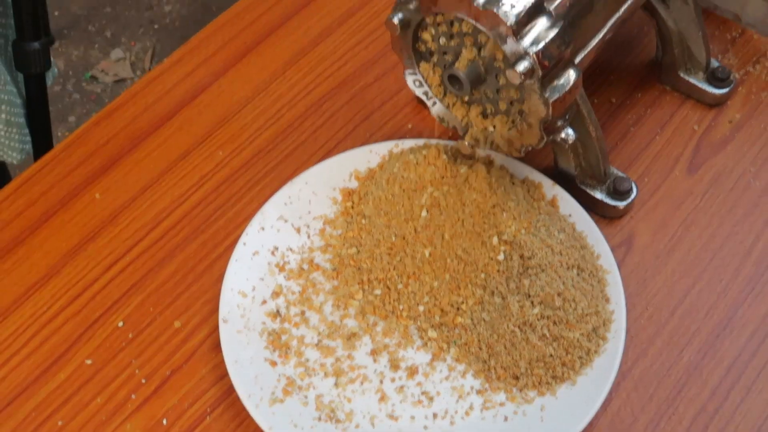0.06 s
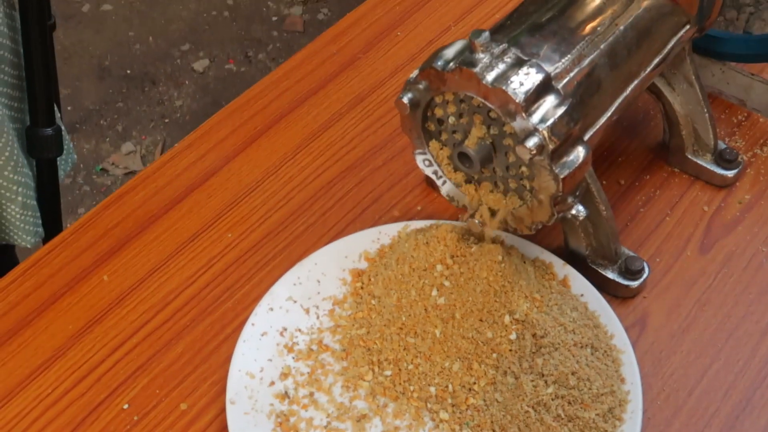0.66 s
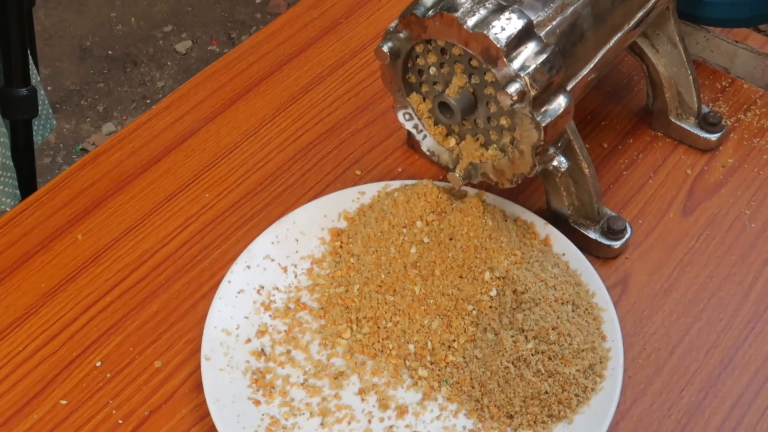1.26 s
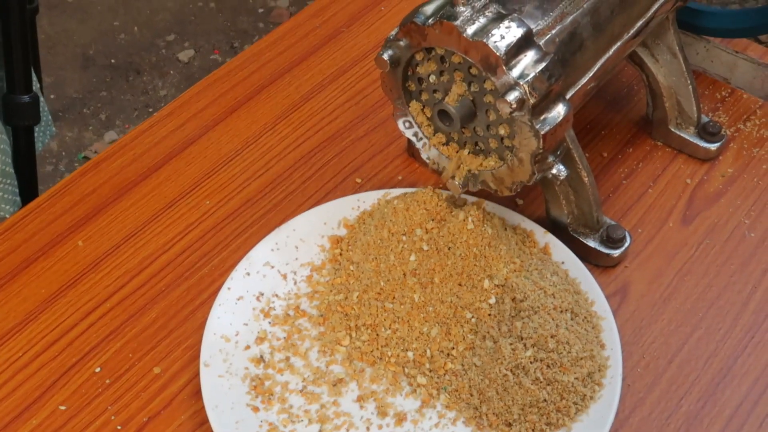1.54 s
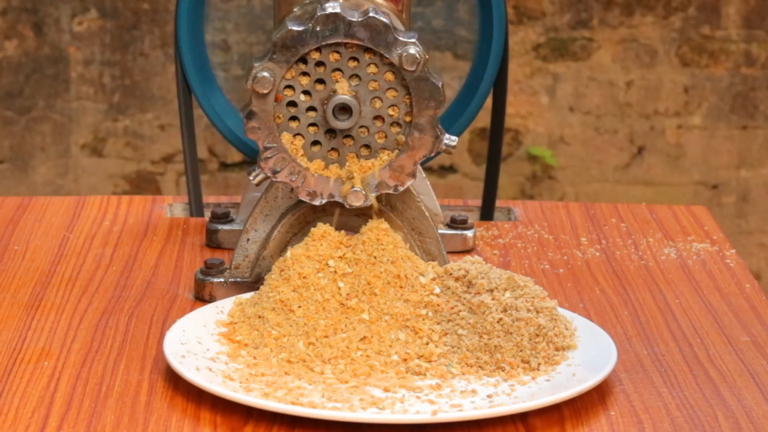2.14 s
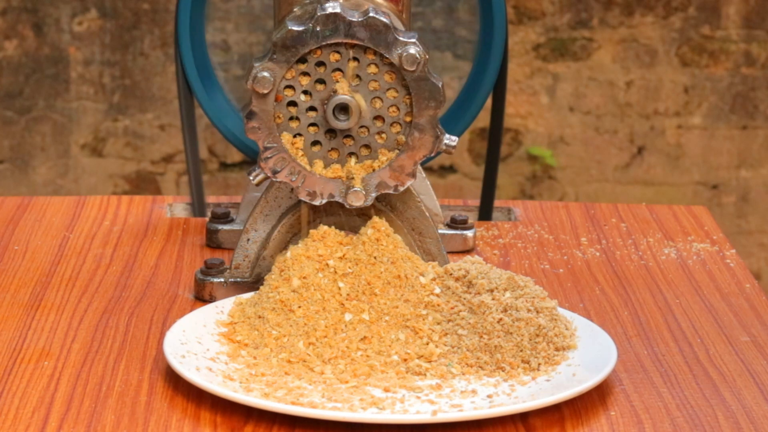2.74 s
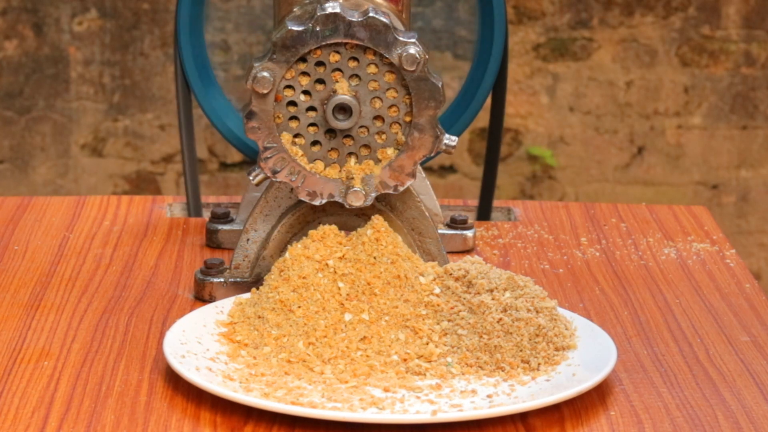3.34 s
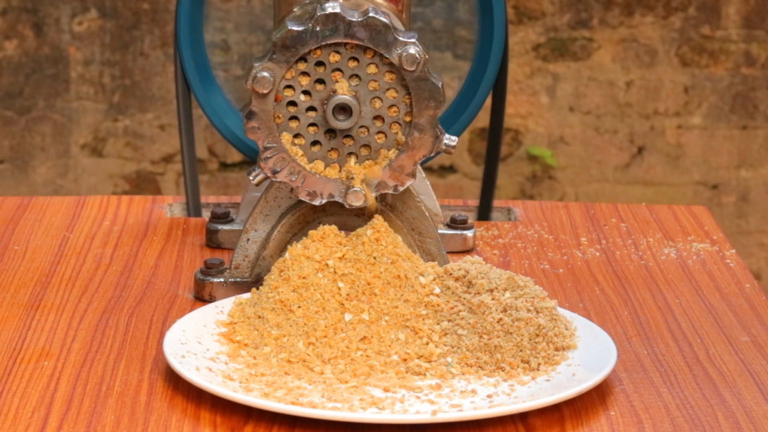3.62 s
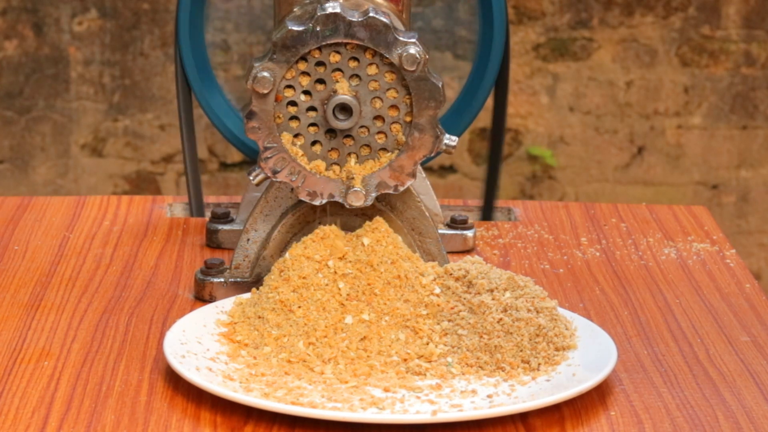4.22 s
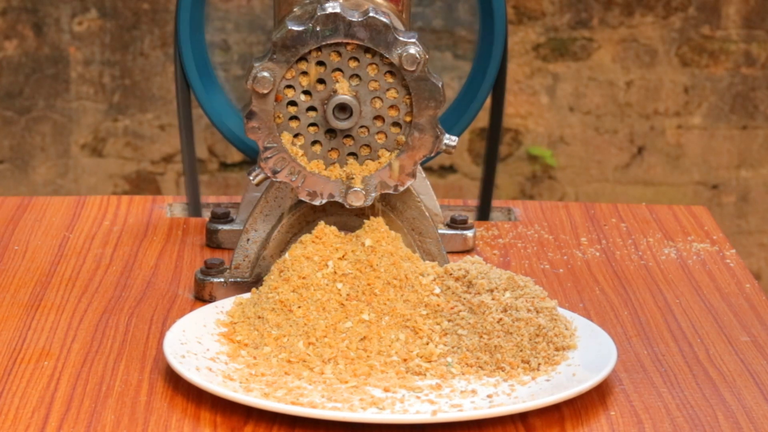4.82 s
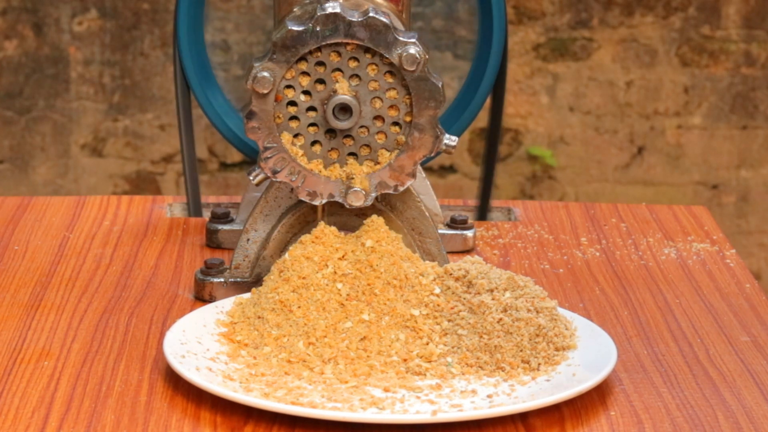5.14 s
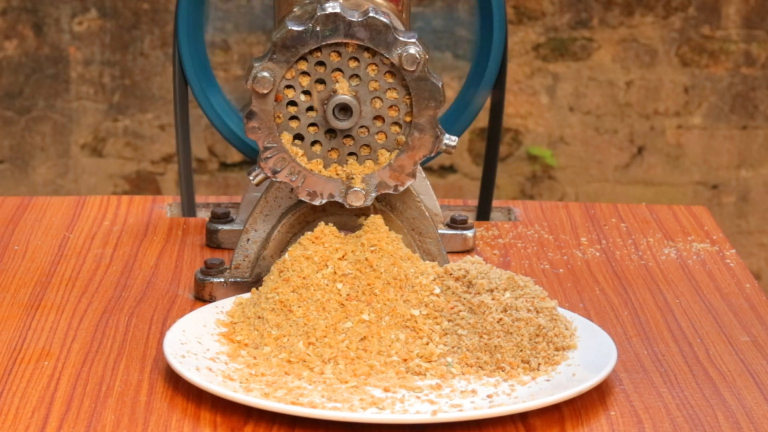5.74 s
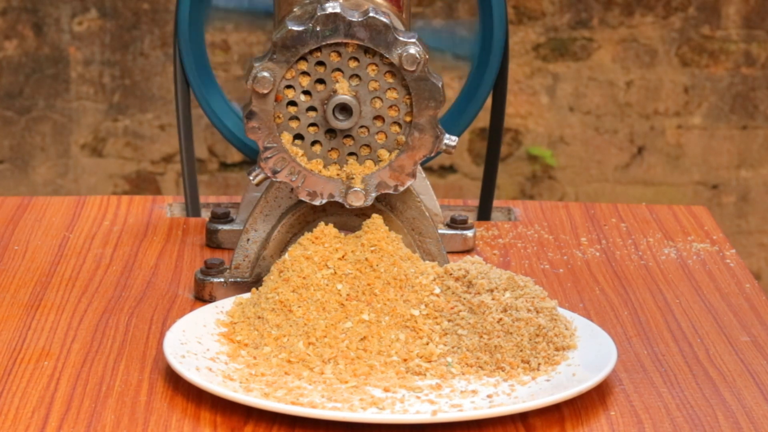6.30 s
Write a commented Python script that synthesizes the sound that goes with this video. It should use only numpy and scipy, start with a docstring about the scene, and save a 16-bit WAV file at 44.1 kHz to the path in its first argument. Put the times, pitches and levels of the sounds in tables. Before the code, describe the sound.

Close up, a metal meat grinder mills cookies with dense churning, irregular knocks, a crumbly rasp and short metallic pings. The sound turns duller and quieter as the microphone shifts to the front, where a motor hum and faint belt buzz come through. The grinding thins, metal snaps sharply, and the machine coasts with soft rubs and another crack. The yard adds a slight echo.

```python
"""A belt-driven metal meat grinder, bolted to a wooden table outdoors, mills cookies and slowly runs empty.
The microphone starts close beside the full barrel: the auger churns and knocks, crumbs rattle and rasp,
the knife pings on the plate. From 1.66 s it is in front of the plate, where the motor hums, the drive
buzzes and the feed thins out. At 5.6 s metal snaps sharply and the hum drops away; the grinding dies,
a faint chirp passes, and parts rub and snap as the machine coasts."""
import sys
import numpy as np
from scipy import signal
from scipy.fft import rfft, irfft
from scipy.io import wavfile

SR = 44100
rng = np.random.default_rng(int(sys.argv[2]) if len(sys.argv) > 2 else 0)


def digitize_waveform(pressure):
    """Quantize a signal to 16-bit integers and store it at the path in sys.argv[1].

    Rows of a 2-D input are taken as channels; values are limited to [-1, 1].
    """
    field = np.atleast_2d(pressure).T
    bounded = np.clip(field, -1, 1)
    quanta = np.round(bounded * 32767).astype(np.int16)
    wavfile.write(sys.argv[1], SR, quanta)


N = 289672

MOVE_S, FADE_S = 1.657, .008   # the microphone goes from beside the barrel to in front of the plate
SHAFT_HZ, PLATE_HZ = 7.35, 3600   # turning of the auger, ring of the perforated plate
# The hard auger knocks. Each row: start in seconds, clack, thud and edge in dB, contact pitch in Hz.
HARD_KNOCKS = [(0.002, -27, -19, -31.5, 1030), (0.157, -30.5, -23.5, -40, 1360),
               (0.198, -29, -14, -38, 2020), (0.270, -31.5, -31, -46, 1120),
               (0.334, -23.5, -12, -35.5, 2010), (0.4678, -32.5, -17, -62, 1900),
               (0.597, -31, -14, -62, 1320), (0.7078, -29.5, -23.5, -38, 1660),
               (0.821, -32, -17.5, -39, 1360), (0.872, -25, -12, -36.5, 1300),
               (0.949, -39.5, -52, -46, 1960), (1.0038, -25.5, -12.5, -45, 2000),
               (1.158, -38, -40, -62, 2220), (1.246, -32, -32, -38.5, 1340), (1.276, -34, -25, -62, 1880),
               (1.4201, -28.5, -19.5, -36, 1180), (1.492, -34, -45, -41, 1210),
               (1.524, -32.5, -40, -37, 2000), (1.7394, -33, -17.5, -46, 1510),
               (1.951, -44.5, -27.5, -63, 1590), (1.9846, -34.5, -35, -49, 1460),
               (2.085, -44, -35, -71, 1060), (2.155, -33.5, -25, -48, 1480), (2.225, -36.5, -33, -49, 1620),
               (2.42, -38.5, -24.5, -51, 1570), (2.559, -41, -23.5, -55, 1000),
               (2.64, -35.5, -23, -65, 1350), (2.805, -41, -35, -54, 1520), (2.968, -50, -24, -58, 1460),
               (2.987, -35, -23, -45, 1490), (3.1096, -32.5, -27, -39.5, 2000),
               (3.183, -38, -43, -52, 1480), (3.249, -30.5, -29, -41.5, 1540),
               (3.384, -35.5, -34, -50, 1530), (3.452, -48, -46, -58, 1520),
               (3.6523, -31, -26.5, -42.5, 1540), (3.789, -41.5, -28.5, -46, 1530),
               (4.054, -29.5, -46, -49, 1480), (4.3338, -31, -26.5, -44, 1560),
               (4.408, -41, -38, -50.5, 1410), (4.469, -38.5, -51, -56, 1020), (4.564, -43, -37, -63, 1260),
               (4.5965, -35, -35, -53, 1360), (4.716, -40.5, -52, -54, 1630), (4.735, -40, -40, -59, 1440),
               (4.875, -37.5, -32, -51.5, 1500), (4.966, -42.5, -31.5, -71, 1510),
               (5.010, -34.5, -30, -54, 1430), (5.116, -39, -36, -58, 1450), (5.146, -35, -29.5, -55, 1330),
               (5.222, -44.5, -38.5, -53, 1310), (5.277, -37, -54, -59, 1480),
               (5.4186, -41, -38.5, -59, 1900), (5.555, -39.5, -31, -57, 1500),
               (5.659, -39, -51.5, -46, 1510), (5.6896, -30, -34, -54, 1470),
               (5.856, -45, -40.5, -71, 1504)]
# The spectrum of crumbs scraping the plate. Each row: frequency in Hz, level in dB.
RASP_SPECTRUM = [(1200, -43.5), (2200, 3.5), (2900, -0.5), (3550, 1.5), (4300, -5), (5300, -4),
                 (6300, -14.5), (7500, -18), (10000, -18), (12000, -19), (13800, -16.5), (16000, -31.5)]


def grinding(beside, press_s, churn_db, rattle_db, rasp_db, ring_db, sing_db, sing_width_hz,
             throb_db, flutter_db, crackle_db, crackles_per_s, clump_db):
    """Crumbs are crushed in surges, two and four to a turn of the shaft; the pressure peaks at press_s."""
    low_db, middle_db, high_db = auger_load(beside)
    turn = 2 * np.pi * SHAFT_HZ * (np.arange(N) / SR - press_s)
    surge_db = throb_db * (np.cos(2 * turn) + np.cos(4 * turn)) + flutter_db * drift(70)
    churn = rms_one(body(grains(6000, 1.47) * from_db(0.44 * surge_db), beside, wander_db=3))
    rattle = rms_one(metal(grains(1100, 2.94) * from_db(surge_db), beside, wander_db=1.5))
    rasp = rms_one(plate(grains(4100, 2.0) * from_db(0.45 * surge_db), ring_db))
    # the knife sets the plate singing in short, uneven spells
    plate_tone = resonance(resonance(grains(5000, 0.88), PLATE_HZ, sing_width_hz), PLATE_HZ, 300)
    singing = rms_one(plate_tone * from_db(10 * np.tanh(drift(36))))
    bright = rasp + from_db(sing_db) * singing + from_db(crackle_db) * crackle(crackles_per_s)
    bright *= from_db(clump_db * np.tanh(drift(28)))   # crumbs come through in clumps
    return (from_db(low_db + churn_db) * churn + from_db(middle_db + rattle_db) * rattle
            + from_db(high_db + rasp_db) * bright)


def auger_load(beside, swell_s=0.013, spill_s=0.021, empty_s=5.708, empty_db_per_s=91):
    """Churn, rattle and rasp in dB: up 1 dB around each hard knock, dying once the barrel is empty."""
    # The load heard beside the full barrel, and in front as it empties and the feed grows uneven.
    # Each row: time in seconds, then churn, rattle and rasp in dB.
    load_beside = [(0.0, -20.5, -34.5, -42), (0.3, -24.5, -36.5, -43.5), (0.4, -23, -34.5, -43.5),
                   (0.66, -24, -36.5, -43), (0.73, -19.5, -33, -42), (1.0, -22.5, -34.5, -44.5),
                   (1.66, -21, -31, -40.5)]
    load_front = [(1.69, -25.5, -40, -53.5), (2.01, -24.5, -41.5, -53.5), (2.17, -28, -43, -55.5),
                  (2.26, -27.5, -42.5, -54.5), (3.01, -30, -41.5, -53.5), (3.05, -33.0, -44.5, -52.5),
                  (3.72, -35.5, -40, -58.5), (4.3, -36, -46.5, -64), (4.42, -34.5, -41, -58),
                  (4.52, -46, -51.5, -65.5), (4.59, -36, -44.5, -59), (4.73, -43, -48.5, -65),
                  (4.84, -41, -47.5, -60), (4.97, -34.5, -41.5, -63), (5.21, -41.5, -46, -63),
                  (5.39, -36, -43, -61.5), (5.46, -42.5, -47, -70.5), (5.82, -37, -46, -52.5)]
    t = np.arange(N) / SR
    knock_s = np.r_[-1, np.sort(np.array(HARD_KNOCKS)[:, 0]), 2 * N / SR]
    coming = np.searchsorted(knock_s, t)
    swell_db = np.exp((t - knock_s[coming]) / swell_s)
    spill_db = np.exp((knock_s[coming - 1] - t) / spill_s)   # crumbs spill through after the knock
    emptying_db = empty_db_per_s * np.maximum(t - empty_s, 0)
    return np.array(in_time(load_beside if beside else load_front)) + swell_db + spill_db - emptying_db


def knocks(beside, light, clack_db, thud_db, thud_hz, body_db, edge_db, strike, hold_s, decay_s, edge_hz):
    """The auger catches a piece and hits the barrel: a metal clack, a table thud, a bright edge."""
    out = np.zeros(N)
    cushion = signal.butter(4, edge_hz, fs=SR)   # the cookie softens the contact
    table_band = signal.butter(3, [thud_hz / 1.255, thud_hz * 1.407], "band", fs=SR, output="sos")
    for s, middle_db, low_db, high_db, hz in list(HARD_KNOCKS) + light:
        if (s < MOVE_S) != beside:
            continue
        force = signal.lfilter(*cushion, blow(strike, hold_s, decay_s))
        clack = attack_one(metal(force, beside) + 1.98 * double_resonance(force, hz, 410))
        push = blow(strike, hold_s=0.0065, decay_s=0.0054)
        damped = attack_one(signal.sosfilt(table_band, push))
        thud = attack_one(damped + from_db(body_db) * attack_one(body(push, beside)))
        scrape = signal.lfilter(*cushion, crush(hold_s, decay_s=0.0092))
        edge = attack_one(plate(scrape, ring_db=8))
        add(out, s, from_db(middle_db + clack_db) * clack + from_db(low_db + thud_db) * thud
            + from_db(high_db + edge_db) * edge)
    return out


def light_knocks(beside, press_s, clack_db, thud_db, edge_db, hz, chance=.75, jitter_s=0.0043):
    """Between hard knocks the auger catches small pieces on its half turns; rows as in HARD_KNOCKS."""
    lead_s, last_piece_s = .006, 5.9   # a piece is caught just before the pressure peaks
    half_turn_s = .5 / SHAFT_HZ
    hard_s = np.array(HARD_KNOCKS)[:, 0]
    times = np.arange((press_s - lead_s) % half_turn_s, last_piece_s, half_turn_s)
    load_db, rows = auger_load(beside), []
    for s, (late, weak, pitch), luck in zip(times, rng.standard_normal((200, 3)), rng.random(200)):
        if luck < chance and np.abs(hard_s - s).min() > half_turn_s / 2:
            low_db, middle_db, high_db = load_db[:, int(s * SR)] - 0.5 * weak
            rows.append((s + jitter_s * late, middle_db + clack_db, low_db + thud_db,
                         high_db + edge_db, hz * np.exp(.14 * pitch)))
    return rows


def body(force, beside, wander_db=0):
    """Grinder and table answer a force with their low modes."""
    # The modes heard from each place. Each row: frequency in Hz, width in Hz, gain in dB.
    modes_beside = [(106, 5.2, -10.5), (145, 7.1, 0), (168, 21, -5), (194, 19, -6), (264.6, 22.4, 0),
                    (294, 31, -11), (341, 19, -0.5), (372, 25, -9), (462.4, 16, -3.5), (608, 17, -15),
                    (787, 91, -13.5)]
    modes_front = [(105, 42, -22), (177, 62, -21.5), (291, 18.7, -12), (346, 44, -11), (411, 20.6, -9.5),
                   (465.7, 22.7, 0.5), (516, 27.6, -3.5), (592, 26, -15.5), (718.4, 41, -13.5),
                   (898, 26, -19)]
    modes, band_hz = (modes_beside, [70, 727]) if beside else (modes_front, [146, 910])
    return ring(force, modes, band_hz, wander_db, in_phase=True)


def metal(force, beside, wander_db=0):
    """The cast barrel, auger and plate answer a force with their middle modes."""
    # The modes heard from each place. Each row: frequency in Hz, width in Hz, gain in dB.
    modes_beside = [(860, 26, -6), (1183, 53, 9), (1490, 340, 3), (1793, 230, 4), (1930, 100, 8),
                    (2210, 110, 3.5), (2950, 410, -8.5)]
    modes_front = [(910, 160, -2.5), (1340, 165, 1.5), (1502, 246, -1.5), (1605, 74, 2), (1900, 210, -9.5),
                   (2194, 47, -2.5), (2373, 120, -9.5)]
    modes, band_hz = (modes_beside, [680, 2980]) if beside else (modes_front, [840, 2290])
    return ring(force, modes, band_hz, wander_db)


def plate(force, ring_db):
    """Bright scraping with the thin ring of the perforated plate."""
    scrape = colour(force, RASP_SPECTRUM)
    return scrape + from_db(ring_db) * resonance(scrape, PLATE_HZ, width_hz=330)


def crackle(per_s, spread_db=4.5, width_hz=840, pitches=12):
    """Single crumbs burst, each ringing briefly at one of several pitches."""
    clicks, pitch_index = grains(per_s, spread_db), rng.integers(0, pitches, N)
    bursts = sum(resonance(clicks * (pitch_index == k), hz, width_hz)
                 for k, hz in enumerate(np.geomspace(2500, 13500, pitches)))
    return rms_one(colour(bursts, RASP_SPECTRUM))


def lumps(gain_db, hold_s, decay_s, relative_width):
    """Soft lumps are shoved along the barrel: the table answers each with a dull bump at one pitch."""
    # Each row: start in seconds, level in dB, pitch in Hz.
    shoves = [(0.127, -20.5, 166.6), (0.404, -20, 163), (0.473, -15, 366), (0.743, -23, 466),
              (0.823, -17, 337), (1.226, -21, 460), (1.429, -30, 144), (1.567, -17.5, 358),
              (1.742, -21.5, 552), (1.895, -23, 502), (2.488, -44, 980), (2.662, -25, 476),
              (2.845, -24, 503), (5.625, -34, 450)]
    out = np.zeros(N)
    for s, db, hz in shoves:
        bump = double_resonance(blow(26, hold_s, decay_s), hz, relative_width * hz)
        add(out, s, from_db(db + gain_db) * attack_one(bump, size=1300))
    return out


def dry_ticks(gain_db, hold_s, decay_s, relative_width):
    """Small dry ticks of cracking crumbs or touching metal, each pitched, with a bright spray above it."""
    # Each row: start in seconds, level in dB, pitch in Hz, spray in dB relative to the tick.
    ticks = [(0.411, -35, 2500, -30), (0.653, -41, 3900, -20), (0.708, -40, 5170, -24),
             (0.787, -40, 4460, -20), (0.872, -43, 5200, -26), (0.934, -38, 3430, -21),
             (1.247, -48, 4240, -11), (1.312, -45, 4800, -19), (1.329, -37, 3600, -26),
             (1.466, -46, 4200, -19), (1.544, -40, 2600, -22), (1.611, -39.5, 5200, -9),
             (2.378, -45, 3670, -15), (2.405, -52.5, 5200, -10), (2.431, -52.5, 4230, -19),
             (2.569, -57, 4600, -20), (2.69, -53, 3570, -12), (2.840, -52, 4000, -21),
             (2.866, -51, 3700, -17), (2.968, -53, 3400, -11), (3.107, -42, 3280, -25),
             (3.275, -50, 2900, -22), (3.491, -53, 3050, -19), (3.540, -49, 3380, -26),
             (3.786, -51, 3300, -28), (3.899, -46, 2700, -26), (5.767, -52.5, 3040, -32),
             (6.038, -53.5, 3220, -43), (6.065, -59.5, 3200, -42), (6.086, -61.5, 3000, -36.5),
             (6.339, -33, 3470, -32.5), (6.403, -52, 3900, -24), (6.417, -59, 4300, -15),
             (6.448, -51.5, 3130, -25), (6.5207, -47, 4100, -40)]
    out = np.zeros(N)
    spray_band = signal.butter(2, [6500, 13500], "band", fs=SR, output="sos")
    soften = signal.butter(4, 6000, fs=SR, output="sos")
    for s, db, hz, spray_db in ticks:
        force = crush(hold_s, decay_s)
        tick = attack_one(double_resonance(signal.sosfilt(soften, force), hz, relative_width * hz), 300)
        spray = attack_one(signal.sosfilt(spray_band, force), 300)
        add(out, s, from_db(db + gain_db) * (tick + from_db(spray_db) * spray))
    return out


def knife_pings(gain_db, hold_s, decay_s, width_hz):
    """The knife snags and scrapes for an instant: the plate answers with a short, rough ping."""
    # Each row: start in seconds, level in dB.
    snags = [(0.0, -29), (0.143, -39.5), (0.198, -39), (0.27, -36), (0.337, -29), (0.396, -43),
             (0.494, -37), (0.534, -36), (0.651, -34), (0.71, -30), (0.788, -37), (0.872, -40),
             (0.933, -35), (1.109, -43), (1.247, -30), (1.421, -33), (1.49, -44), (1.521, -41),
             (1.614, -46.5)]
    out = np.zeros(N)
    for s, db in snags:
        ping = resonance(resonance(blow(14, hold_s, decay_s), PLATE_HZ, width_hz), PLATE_HZ, 400)
        add(out, s, from_db(db + gain_db) * attack_one(ping))
    return out


def snaps(gain_db, treble_db, tail_s, treble_s, split_hz=8200):
    """Metal snaps against metal: a short, very bright crack and its diffuse, dying tail."""
    # Each row: start in seconds, level in dB, relative treble in dB, rise in seconds, relative tail in dB.
    hits = [(2.226, -26.5, -26, 0.00053, -22), (5.599, -29.5, 1, .0003, -37),
            (5.6167, -11, 1, 0.00017, -29.5), (5.642, -36.5, 0, .001, -32),
            (6.317, -34.5, -22, 0.0055, -22), (6.3329, -29, -4, 0.0078, -17)]
    # The colour of the crack. Each row: frequency in Hz, level in dB.
    spectrum = [(400, -32), (1300, -9.5), (2130, 6), (2900, -6.5), (3550, 1), (4400, -4.5), (6200, -9),
                (7500, -22), (10000, -20), (11400, -11), (12400, -14), (13000, -12), (13550, -3),
                (14000, -13.5), (14600, -20), (16000, -13)]
    out = np.zeros(N)
    lowpass, highpass = (signal.butter(4, split_hz, side, fs=SR, output="sos") for side in ("low", "high"))
    for s, db, high_db, rise_s, tail_db in hits:
        force = crush(rise_s + 0.00079, 0.005, size=32768) + from_db(tail_db) * crush(0, tail_s, size=32768)
        t = np.arange(len(force)) / SR
        crack = colour(force * np.minimum(t / rise_s, 1), spectrum)
        low = attack_one(signal.sosfilt(lowpass, crack))
        high = attack_one(signal.sosfilt(highpass, crack)) * np.exp(-t / treble_s)   # treble dies sooner
        add(out, s, from_db(db + gain_db) * (low + from_db(high_db + treble_db) * high))
    return out


def rubs():
    """Parts rub as the machine coasts: each rub swells and dies in body and metal, with a dry swish."""
    # Each row: peak time, rise and decay in seconds, then body, metal and swish in dB.
    swells = [(6.025, 0.061, 0.046, -44.5, -58.5, -72), (6.17, 0.19, 0.22, -53, -68, -79),
              (6.315, 0.022, 0.02, -43, -50.5, -67), (6.42, 0.085, 0.07, -71, -85, -62.5),
              (6.497, 0.017, 0.026, -52.5, -83, -69), (6.55, .03, 0.052, -59, -79, -69)]
    # The colour of the swish. Each row: frequency in Hz, level in dB.
    spectrum = [(1200, -23), (2200, -3), (3200, 4), (4200, 2), (5200, -9), (6500, -11.5), (8000, -22.5),
                (13000, -27.5)]
    t = np.arange(N) / SR
    rumble = rms_one(body(grains(4100, 2.3), beside=False))
    rattle = rms_one(metal(grains(1100, 2.7), beside=False))
    swish = from_db(3.1 * drift(120)) * rms_one(colour(grains(3800, 2.8), spectrum))
    out = np.zeros(N)
    for s, rise_s, decay_s, *levels_db in swells:
        from_peak = (t - s) / np.where(t < s, rise_s, decay_s)
        envelope = np.exp(-np.minimum(from_peak ** 2, 20))
        out += envelope * (from_db(levels_db) @ np.array([rumble, rattle, swish]))
    return out


def motor_hum():
    """Multiples of twice the mains frequency and one higher tone; they fade, then drop at power-off."""
    # Each row: time in seconds, level in dB.
    fade = [(1.7, -29.5), (2.3, -32), (2.95, -43), (3.1, -46), (4.3, -46), (5.55, -52.5), (5.65, -63.5)]
    # Each row: frequency in Hz, relative level in dB.
    tones = [(300, -11), (400, -12.5), (500, -1.5), (600, -18.5), (1342, -18.5)]
    level_db, = in_time(fade)
    t = np.arange(N) / SR
    hum = sum(from_db(db + 4.5 * drift(8.3)) * np.sin(2 * np.pi * (hz * t + rng.random()))
              for hz, db in tones)
    return from_db(level_db) * rms_one(hum)


def belt_drive(level_db, cycle_hz, roughness):
    """One soft pulse to a cycle of the drive: a steady low buzz, bared as the barrel empties."""
    # The colour of a pulse. Each row: frequency in Hz, level in dB.
    spectrum = [(50, -40), (115, -15.5), (175, -22), (230, -42), (290, -4), (400, 4), (460, 8), (520, -11),
                (580, -4), (750, -11.5), (850, -38.5), (1300, -23), (2400, -35.5), (6000, -78.5)]
    cycles = np.cumsum(cycle_hz * (1 + 0.013 * drift(9))) / SR
    pulses = np.diff(np.floor(cycles), prepend=0) * (1 + roughness * rng.standard_normal(N))
    return from_db(level_db) * rms_one(colour(pulses, spectrum))


def chirp(waver_hz, flicker_db):
    """A faint, high whistle wavers and flickers as it rises, then sinks and trails off."""
    # Each row: time in seconds, pitch in Hz, level in dB.
    glide = [(5.79, 9450, -105), (5.81, 9450, -82), (5.84, 9680, -79), (5.87, 9820, -78), (5.89, 9820, -93),
             (5.95, 9430, -94), (6.02, 9280, -94), (6.08, 9450, -95), (6.16, 9030, -99), (6.27, 8650, -98),
             (6.3, 8600, -115)]
    hz, level_db = in_time(glide)
    envelope = from_db(level_db) - from_db(level_db.min())
    flicker = from_db(flicker_db * np.tanh(drift(160)))
    return envelope * flicker * np.sin(2 * np.pi * np.cumsum(hz + waver_hz * drift(250)) / SR)


def yard(x, wet_db, t60_s=0.38):
    """The yard's walls return a smooth tail, duller than the direct sound."""
    t = np.arange(SR) / SR
    tail = rng.standard_normal(SR) * from_db(-60 * t / t60_s) * (t > .008)
    tail = colour(tail, [(200, 10.5), (1500, 3.0), (4000, -2.0), (15000, -11.0)])
    return x + from_db(wet_db) * signal.fftconvolve(x, tail / np.linalg.norm(tail))[:N]


def air(level_db):
    """Still outdoor air: a faint, smooth noise."""
    # Each row: frequency in Hz, level in dB.
    spectrum = [(30, -23), (120, -2.5), (500, 5.5), (1500, -7), (4000, -12), (7000, -23), (10000, -25),
                (15000, -21)]
    return from_db(level_db) * rms_one(colour(rng.standard_normal(N), spectrum))


def grains(per_s, spread_db):
    """Random tiny fractures of uneven size."""
    sizes = from_db(spread_db * np.minimum(rng.exponential(1, N), 4)) * rng.choice([-1, 1], N)
    return rms_one(sizes * (rng.random(N) < per_s / SR))


def crush(hold_s, decay_s, size=8192):
    """Contact noise that holds while a piece gives way, then dies."""
    t = np.arange(size) / SR
    return rng.standard_normal(size) * np.exp(-np.maximum(t - hold_s, 0) / decay_s)


def blow(strike, hold_s, decay_s):
    """The impulse of first contact, followed by the crush."""
    force = crush(hold_s, decay_s)
    force[0] += strike
    return force


def ring(force, modes, band_hz, wander_db, in_phase=False):
    """Parallel modes radiate within a band; a contact wandering along the barrel shifts their balance."""
    out = 0
    for k, (hz, width_hz, db) in enumerate(modes):
        share = from_db(wander_db * drift(14)) if wander_db else 1
        sign = 1 if in_phase else (-1) ** k   # modes in phase leave deep valleys between them
        out = out + sign * from_db(db) * resonance(force * share, hz, width_hz)
    return signal.sosfilt(signal.butter(3, band_hz, "band", fs=SR, output="sos"), out)


def resonance(x, hz, width_hz):
    """A two-pole resonance with gain 1 at its peak."""
    r = np.exp(-np.pi * width_hz / SR)
    feedback = [1, -2 * r * np.cos(2 * np.pi * hz / SR), r * r]
    return signal.lfilter(np.array([1, 0, -1]) * (1 - r * r) / 2, feedback, x + 1e-18)


def double_resonance(x, hz, width_hz):
    """The same resonance twice, for steeper flanks."""
    return resonance(resonance(x, hz, width_hz), hz, width_hz)


def colour(x, spectrum, size=4096):
    """A minimum-phase filter that follows rows of frequency in Hz and gain in dB."""
    hz, db = np.transpose(spectrum)
    grid_hz = np.maximum(np.arange(size // 2 + 1) * SR / size, 1)
    gain = from_db(np.interp(np.log(grid_hz), np.log(hz), db))
    cepstrum = irfft(np.log(gain))
    cepstrum[1:size // 2] *= 2
    response = irfft(np.exp(rfft(cepstrum[:size // 2], size)))
    return signal.fftconvolve(x, response)[:len(x)]


def drift(per_s, size=2048):
    """A line gliding between random values of spread 1."""
    return np.interp(np.arange(N) / SR * per_s, np.arange(size), rng.standard_normal(size))


def in_time(rows):
    """The columns of a timed table, sample by sample."""
    s, *columns = np.transpose(rows)
    return [np.interp(np.arange(N) / SR, s, column) for column in columns]


def from_db(db):
    return 10 ** (np.asarray(db) / 20)


def rms_one(x):
    return x / np.sqrt(np.mean(x ** 2) + 1e-20)


def attack_one(x, size=800):
    """Scale a blow to rms 1 over its first samples."""
    return x / np.sqrt(np.mean(x[:size] ** 2))


def add(out, s, sound):
    """Mix a sound in at s seconds."""
    at = max(round(s * SR), 0)
    out[at:at + len(sound)] += sound[:N - at]


def scene():
    """The grinder from close beside the barrel, then from in front, each place with its own echo."""
    moved = np.clip((np.arange(N) / SR - MOVE_S) / FADE_S + .5, 0, 1)
    press_beside_s, press_front_s = 0.2017, 3.113
    pieces = lumps(gain_db=-4.5, hold_s=0.012, decay_s=0.016, relative_width=0.18)
    pieces += dry_ticks(gain_db=-2.0, hold_s=0.0012, decay_s=0.0048, relative_width=0.39)

    beside = grinding(True, press_beside_s, churn_db=0.5, rattle_db=-3.5, rasp_db=-1.0, ring_db=-30,
                      sing_db=-7.5, sing_width_hz=35, throb_db=1.0, flutter_db=3.5,
                      crackle_db=-6.5, crackles_per_s=530, clump_db=1.0)
    light = light_knocks(True, press_beside_s, clack_db=-17, thud_db=-9, edge_db=-1, hz=1660)
    beside += knocks(True, light, clack_db=1.0, thud_db=-3, thud_hz=350, body_db=1.5, edge_db=-0.5,
                     strike=14.4, hold_s=0.005, decay_s=0.0019, edge_hz=11300)
    beside += knife_pings(gain_db=-5.5, hold_s=0.0013, decay_s=0.003, width_hz=26) + (1 - moved) * pieces

    front = grinding(False, press_front_s, churn_db=-1.0, rattle_db=-0.5, rasp_db=-2.5, ring_db=3,
                     sing_db=-11.0, sing_width_hz=290, throb_db=1.4, flutter_db=2.5,
                     crackle_db=-14.0, crackles_per_s=220, clump_db=2)
    light = light_knocks(False, press_front_s, clack_db=-10.5, thud_db=-6.5, edge_db=-15.5, hz=1480)
    front += knocks(False, light, clack_db=0.5, thud_db=-3.5, thud_hz=450, body_db=4.5, edge_db=-1.3,
                    strike=6.9, hold_s=0.0033, decay_s=0.004, edge_hz=4640)
    front += moved * pieces + rubs() + motor_hum()
    front += belt_drive(level_db=-54.5, cycle_hz=57.5, roughness=0.24)

    direct = snaps(gain_db=-12.5, treble_db=-4.0, tail_s=0.083, treble_s=0.088)
    direct += chirp(waver_hz=130, flicker_db=5.0)
    in_yard = (1 - moved) * yard(beside, wet_db=-21) + moved * yard(front, wet_db=-17.5)
    return (in_yard + direct + air(level_db=-75.5))[None]


def record(dry):
    """One microphone with a deep notch at 8250 Hz; the top is cut above 15750 Hz."""
    notched = 0.82 * signal.lfilter(*signal.iirnotch(8250, 4.5, fs=SR), dry) + 0.15 * dry
    return signal.sosfilt(signal.ellip(10, .2, 80, 15750, fs=SR, output="sos"), notched)


dry = scene()
out = record(dry)
digitize_waveform(out)
```